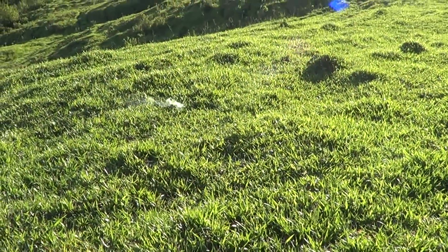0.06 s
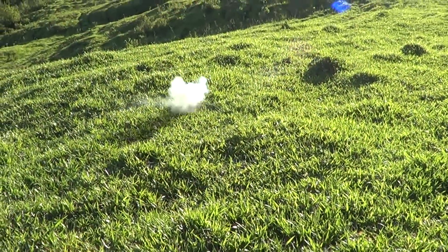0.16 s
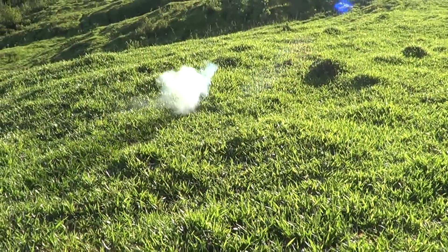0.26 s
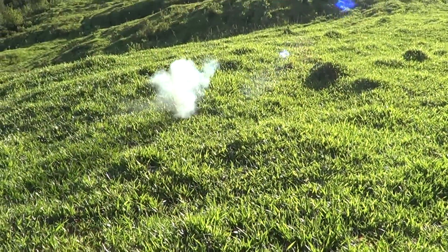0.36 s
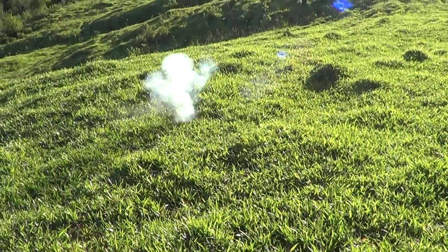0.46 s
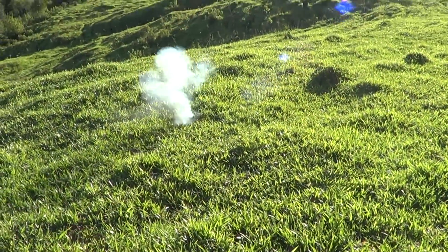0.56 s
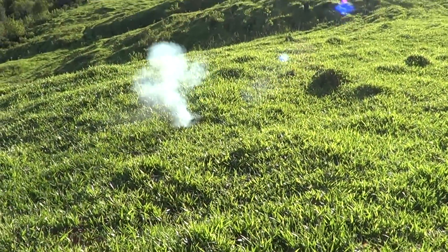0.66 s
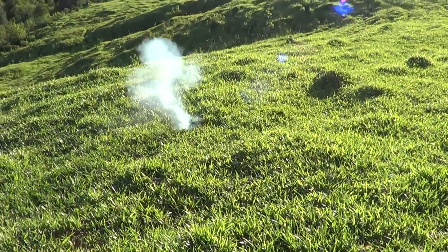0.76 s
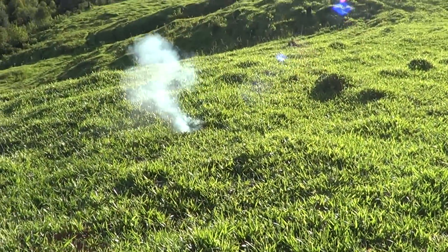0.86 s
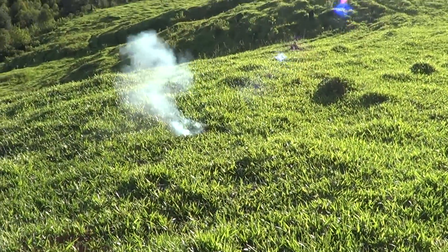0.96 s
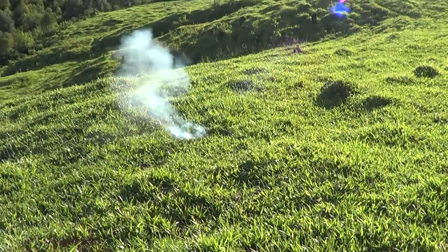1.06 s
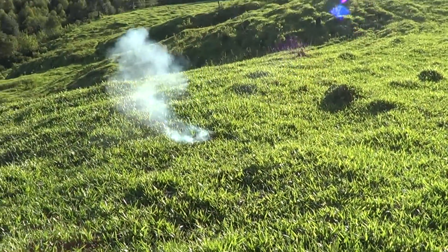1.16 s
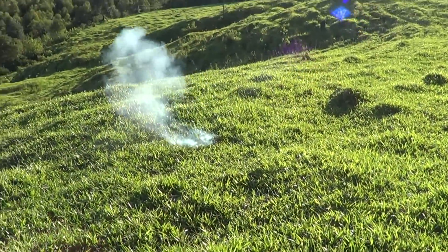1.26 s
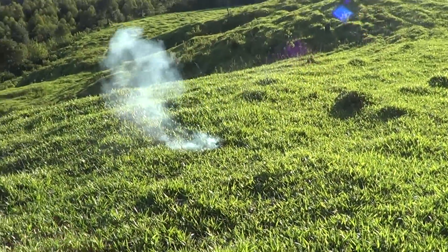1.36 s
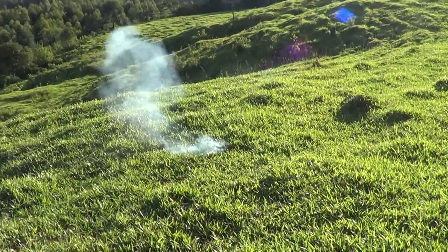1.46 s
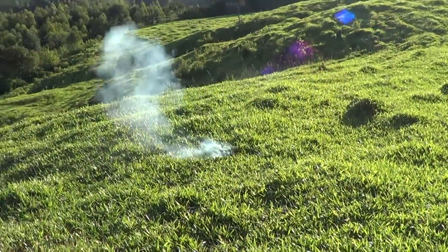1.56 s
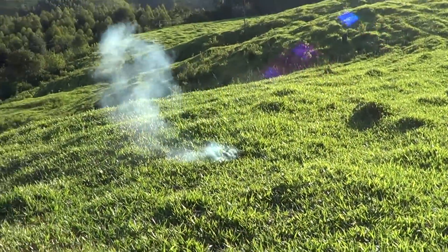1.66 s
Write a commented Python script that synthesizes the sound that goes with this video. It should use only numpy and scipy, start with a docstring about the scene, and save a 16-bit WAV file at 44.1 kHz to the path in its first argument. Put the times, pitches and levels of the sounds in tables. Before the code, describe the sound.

Single sharp firecracker crack outdoors, with a short low boom and scattered echoes fading across a hillside

```python
"""Firecracker on a grassy hillside

Over a faint hiss of air, a low wind and an insect's chirr come a tiny snap and one sharp crack: bursts of noise.
A boom rolls off through the grass: noise in a band that narrows and loses its top.
Slopes mostly on the right return a crackling wash of noise and single echoes made of clicks and short tails.
Far hills on the left add a soft roll of noise. Later, grass ticks and rustles underfoot in short noise flicks.
"""
import sys
import numpy as np
from scipy import signal
from scipy.io import wavfile
from scipy.ndimage import uniform_filter1d

SR = 44100
rng = np.random.default_rng(int(sys.argv[2]) if len(sys.argv) > 2 else 0)


def master_out(mix):
    """Clip the mix to full scale and print it as 16-bit PCM to the path in sys.argv[1]."""
    frames = np.transpose(np.atleast_2d(mix))
    ceiling = np.clip(frames, -1, 1)
    pcm = np.round(ceiling * 32767).astype(np.int16)
    wavfile.write(sys.argv[1], SR, pcm)


N = 74970
T = np.arange(N) / SR   # time [s]
BANG_S = 0.2035


def from_db(db):
    """Turn decibels into a gain."""
    return 10 ** (np.asarray(db) / 20)


def rms_one(x):
    """Scale a sound to an average (rms) level of 1."""
    return x / np.sqrt(np.mean(x ** 2) + 1e-20)


def in_time(rows):
    """Draw straight lines between (time, value) points, one value per sample."""
    return np.interp(T, *np.transpose(rows))


def at_hz(points, hz):
    """Read a (frequency, value) table at hz, with frequency on a log scale."""
    point_hz, value = np.transpose(points)
    return np.interp(np.log(hz), np.log(point_hz), value)


def pan(left_minus_right_db):
    """Give left and right gains that keep the total power equal."""
    gains = from_db(np.array([[.5], [-.5]]) * left_minus_right_db)
    return gains / np.sqrt(np.mean(gains ** 2, axis=0))


def bandpass(x, low_hz, high_hz):
    """Keep mainly the sound between two frequencies."""
    return signal.sosfilt(signal.butter(2, [low_hz, high_hz], "band", fs=SR, output="sos"), x)


def stereo_noise(likeness):
    """Make white noise, from unrelated (0) to nearly the same (1) in the two ears."""
    alike = np.clip(likeness, 0, .999)
    mid, side = rng.standard_normal((2, N))
    return np.sqrt((1 + alike) / 2) * mid + np.sqrt((1 - alike) / 2) * side * [[1], [-1]]


def coloured(gain_db, likeness):
    """Add up quarter-octave noise bands, each with its own gain, which may move in time, and stereo width."""
    edges = np.geomspace(22, 17500, 39)
    white = rng.standard_normal((2, 2, N))
    out = 0
    for k, (low_hz, high_hz) in enumerate(zip(edges, edges[1:])):
        hz = np.sqrt(low_hz * high_hz)
        alike = np.clip(at_hz(likeness, hz), 0, .995)
        # neighbouring bands take turns with two separate noises
        mid, side = bandpass(white[k % 2], low_hz, high_hz)
        stereo = np.sqrt(1 + alike) * mid + np.sqrt(1 - alike) * side * [[1], [-1]]
        out = out + from_db(gain_db(hz)) * stereo
    return out


def shaped(colour, likeness):
    """Make steady noise with a given spectrum and an rms level of 1."""
    return rms_one(coloured(lambda hz: at_hz(colour, hz), likeness))


def smoothed(x, span_s):
    """Take a moving average twice."""
    size = max(int(span_s * SR), 2)
    return uniform_filter1d(uniform_filter1d(x, size), size)


def evened(x, span_s):
    """Hold the short-time level near 1."""
    power = smoothed(np.mean(x ** 2, axis=0), span_s)
    return x / np.sqrt(np.abs(power) + 1e-20)


def flutter(span_s):
    """Make random swings about span_s long, with a spread of 1."""
    return rms_one(smoothed(rng.standard_normal(N), span_s))


def burst(start, hold, decay):
    """Shape a level that starts at once, holds, then dies away exponentially."""
    return (T >= start) * np.exp(-np.clip((T - start - hold) / decay, 0, 50))


def puff(start, db, hz, octaves, decay, likeness, slap=0):
    """Filter a short noise tail, with an optional click at its head, to one band of pitch."""
    half = 2 ** (np.clip(octaves, .03, 4) / 2)
    tail = burst(start, 0, decay) * stereo_noise(likeness)
    click = slap * (np.arange(N) == int(start * SR))
    banded = bandpass(tail + click, hz / half, min(hz * half, .45 * SR))
    # a wider band lets more noise through, so divide by its width
    return from_db(db) * banded / np.sqrt(hz * (half - 1 / half) * 2 / SR)


# spectrum of the air's hiss: (frequency [Hz], relative level [dB per Hz])
HISS_COLOUR = [(30, -1), (70, 16), (150, 7), (1000, -0.5), (2500, -6.5), (4500, -2), (5600, 4.5),
               (6800, 2.5), (8200, 6), (10500, 1), (13000, -0.5), (16000, -32)]
# level of the hiss: (time [s], level [dB])
HISS_LEVEL = [(0, -45), (0.2, -46), (0.3, -35), (0.9, -54.5), (1.7, -49)]
# spectrum of the wind's rumble: (frequency [Hz], relative level [dB per Hz])
WIND_COLOUR = [(25, 0), (65, 8), (120, -9), (300, -25)]
# how alike hiss and wind are in the two ears: (frequency [Hz], likeness [0-1])
AIR_LIKENESS = [(100, 0.97), (500, 0.063), (2400, 0.073), (9000, 1)]
WIND_DB = -59


def air():
    """Hiss that swells just after the bang, sinks and partly returns, over a steady low rumble of wind."""
    hiss = from_db(in_time(HISS_LEVEL)) * shaped(HISS_COLOUR, AIR_LIKENESS)
    wind = from_db(WIND_DB) * shaped(WIND_COLOUR, AIR_LIKENESS)
    return hiss + wind


INSECT_HZ, INSECT_WIDTH_OCT, INSECT_DB = 5910, 0.06, -56.5
INSECT_PULSES_PER_S, INSECT_PULSE_DB = 36, 7   # average rate, swing up and down


def insects():
    """A faint chirr: a narrow band of noise whose level pulses, with slightly uneven timing."""
    edges_hz = INSECT_HZ * 2 ** (INSECT_WIDTH_OCT * np.array([-.5, .5]))
    phase = 2 * np.pi * INSECT_PULSES_PER_S * T + flutter(span_s=0.11)
    pulses = from_db(INSECT_PULSE_DB * np.sin(phase))
    return from_db(INSECT_DB) * rms_one(pulses * bandpass(stereo_noise(likeness=0.34), *edges_hz))


# bursts of the charge: (time [s], level [dB], hold [s], left minus right [dB])
BURSTS = [(0.1422, -23, 0.00085, 1.5), (0.2037, -7, 0.00074, 4)]
# spectrum of snap and crack: (frequency [Hz], relative level [dB per Hz])
CRACK_COLOUR = [(40, 9), (300, 0), (1000, 4.5), (2000, 8), (4000, -4.5), (6000, 6), (9000, 8), (12000, 2.5),
                (16000, -53)]
# spectrum of the spray: (frequency [Hz], relative level [dB per Hz])
SPRAY_COLOUR = [(600, 0), (1200, -3), (2500, -12), (6000, -10), (9000, 0.5), (11000, -4.5), (13000, -10),
                (16000, -13)]
# how alike these are in the two ears: (frequency [Hz], likeness [0-1])
NEAR_LIKENESS = [(60, 0.3), (2000, 0.72), (9000, 1)]
BURST_RELEASE_S = 0.0015
SPRAY_DB, SPRAY_HOLD_S, SPRAY_DECAY_S = -20.5, 0.011, 0.0094
SPRAY_LINGER_DB, SPRAY_LINGER_S = -28.5, 0.04


def crack():
    """The snap and main crack as tiny noise bursts, then bright spray scattered by the grass close by."""
    noise = evened(shaped(CRACK_COLOUR, NEAR_LIKENESS), span_s=0.00074)
    direct = sum(from_db(db) * burst(start, hold, BURST_RELEASE_S) * pan(side)
                 for start, db, hold, side in BURSTS)
    spray = from_db(SPRAY_DB) * burst(BANG_S, SPRAY_HOLD_S, SPRAY_DECAY_S)
    linger = from_db(SPRAY_LINGER_DB) * burst(BANG_S, 0, SPRAY_LINGER_S)
    return direct * noise + (spray + linger) * shaped(SPRAY_COLOUR, NEAR_LIKENESS)


# level of the boom before its surges: (time [s], level [dB])
BOOM_LEVEL = [(0.204, -15.5), (0.26, -12), (0.345, -14.5), (0.415, -16.5), (0.442, -26), (0.456, -19),
              (0.49, -16.5), (0.535, -29), (0.585, -29.5), (0.67, -33.5), (0.85, -46.5), (0.92, -34.5),
              (1.0, -53.5), (1.07, -49), (1.5, -64.5)]
# side of the boom: (time [s], left minus right [dB])
BOOM_PAN = [(0.34, 3), (0.43, 6.5), (0.8, 2)]
# band that survives the grass: (time [s], low edge [Hz], high edge [Hz])
BOOM_BAND = [(0.204, 115, 700), (0.232, 171, 530), (0.269, 226, 398), (0.34, 230, 342), (0.389, 147, 284),
             (0.49, 140, 249), (0.63, 123, 200), (1.0, 106, 154)]
BOOM_EDGE_DB_PER_OCT, BOOM_SKIRT_DB_PER_OCT = 40.5, 26.5   # fall above and below the band
BOOM_SURGE_DB_PER_S, BOOM_SURGE_S = 4.5, 0.024   # surges deepen with age
BOOM_LIKENESS, BOOM_EVEN_S = 0.84, 0.009


def boom():
    """Sound scattered along the ground: longer paths through grass leave a narrower band with less top."""
    time_s, low_hz, high_hz = np.transpose(BOOM_BAND)
    low_oct = np.interp(T, time_s, np.log2(low_hz))
    high_oct = np.interp(T, time_s, np.log2(high_hz))

    def band_gain_db(hz):
        """Quieten pitches the further they lie outside the moving band."""
        above = np.maximum(np.log2(hz) - high_oct, 0)
        below = np.maximum(low_oct - np.log2(hz), 0)
        return -BOOM_EDGE_DB_PER_OCT * above - BOOM_SKIRT_DB_PER_OCT * below

    noise = evened(coloured(band_gain_db, [(200, BOOM_LIKENESS)]), BOOM_EVEN_S)
    surges_db = BOOM_SURGE_DB_PER_S * (T - BANG_S) * flutter(BOOM_SURGE_S)
    level = from_db(in_time(BOOM_LEVEL) + surges_db)
    return (T >= BANG_S) * level * pan(in_time(BOOM_PAN)) * noise


PATCH_DB, PATCH_S = 2, 0.031   # each band swells and fades on its own
GRAIN_S = 0.0053


def scatter(level, colour, peak_s, loss_db, grain_db, likeness):
    """Countless small echoes from a slope: grainy, and duller the later they arrive."""
    late_s = np.clip(T - peak_s, -.15, .6)

    def band_gain_db(hz):
        """Take more treble away with time, and let each band swell at random."""
        return at_hz(colour, hz) - loss_db * late_s * hz / 1000 + PATCH_DB * flutter(PATCH_S)

    grainy = coloured(band_gain_db, likeness) * from_db(grain_db * flutter(GRAIN_S))
    return (T >= BANG_S) * from_db(in_time(level)) * evened(grainy, span_s=0.037)


# level of the wash from the near slopes: (time [s], level [dB])
WASH_LEVEL = [(0.21, -27), (0.28, -36.5), (0.335, -31.5), (0.38, -21), (0.425, -26), (0.46, -25.5),
              (0.51, -27.5), (0.55, -27.5), (0.585, -35), (0.68, -33), (0.76, -38), (0.92, -43.5),
              (0.96, -36), (1.03, -42.5), (1.17, -40.5), (1.7, -75)]
# spectrum of the wash at WASH_PEAK_S: (frequency [Hz], relative level [dB per Hz])
WASH_COLOUR = [(30, -28), (300, -15.5), (700, -1), (1100, -7), (2100, 2), (3000, 0), (5000, 0), (8000, 1.5),
               (11000, -6), (15000, -26)]
# side of the wash: (time [s], left minus right [dB])
WASH_PAN = [(0.21, 0), (0.29, -5.5), (0.55, -5), (1.1, -1)]
# how alike the wash is in the two ears: (frequency [Hz], likeness [0-1])
WASH_LIKENESS = [(300, 0.81), (6000, 0.65)]
WASH_PEAK_S, WASH_LOSS_DB_PER_KHZ_S, WASH_GRAIN_DB = 0.37, 10, 2


def near_wash():
    """A crackling wash: scattered noise from the near slopes, leaning right."""
    wash = scatter(WASH_LEVEL, WASH_COLOUR, WASH_PEAK_S, WASH_LOSS_DB_PER_KHZ_S, WASH_GRAIN_DB, WASH_LIKENESS)
    return wash * pan(in_time(WASH_PAN))


# single echoes off the slopes:
# (time [s], strength [dB], centre [Hz], width [octaves], decay [s], left minus right [dB])
ECHOES = [(0.297, -26, 3400, 0.55, 0.0016, -12), (0.34, -24.5, 1740, 1, 0.0016, -2),
          (0.388, -20.5, 1830, 3, 0.012, -27), (0.4493, -14.5, 970, 1.84, 0.0024, -11),
          (0.4675, -21, 1160, 2.6, 0.0037, -5.5), (0.481, -24, 2020, 0.6, 0.0042, -7),
          (0.491, -20, 2180, 0.33, 0.0035, -3), (0.506, -24.5, 2100, 0.17, 0.0013, 3),
          (0.534, -23, 1460, 2.2, 0.0049, -5), (0.546, -25, 2130, 0.15, 0.0075, -5),
          (0.685, -29.5, 1720, 0.63, 0.0045, -6), (0.7602, -18.5, 578, 0.81, 0.0015, -6),
          (0.787, -32.5, 750, 1, 0.0063, -6), (0.898, -34, 660, 0.74, 0.0042, -6.5),
          (0.971, -33.5, 646, 1.1, 0.0059, -2), (1.504, -34, 630, 0.79, 0.0049, 4)]
ECHO_SLAP = 6.8   # clean click at the head of each echo, against its rough tail


def single_echoes():
    """Separate returns of the bang: each a band-limited click with a short noise tail."""
    return sum(puff(start, db, hz, octaves, decay, likeness=1.0, slap=ECHO_SLAP) * pan(side)
               for start, db, hz, octaves, decay, side in ECHOES)


# level of the roll from the far hills: (time [s], level [dB])
ROLL_LEVEL = [(0.21, -94), (0.75, -54), (1.0, -45), (1.17, -40), (1.32, -39), (1.52, -37), (1.63, -42),
              (1.7, -41.5)]
# spectrum of the roll at ROLL_PEAK_S: (frequency [Hz], relative level [dB per Hz])
ROLL_COLOUR = [(50, -30), (150, 1), (620, 3.5), (1600, -2), (2800, -6.5), (5000, -6.5), (8000, -25.5),
               (15000, -74)]
# how alike the roll is in the two ears: (frequency [Hz], likeness [0-1])
ROLL_LIKENESS = [(1000, 0.96), (4500, 0.63)]
ROLL_PEAK_S, ROLL_LOSS_DB_PER_KHZ_S, ROLL_GRAIN_DB = 1.335, 6.5, 1.5
ROLL_PAN_DB = 2.5   # left minus right


def far_roll():
    """A soft roll: scattered noise from the far hills, arriving slowly from the left."""
    roll = scatter(ROLL_LEVEL, ROLL_COLOUR, ROLL_PEAK_S, ROLL_LOSS_DB_PER_KHZ_S, ROLL_GRAIN_DB, ROLL_LIKENESS)
    return roll * pan(ROLL_PAN_DB)


# grass blades ticking and brushing underfoot: (time [s], level [dB], centre [Hz], decay [s])
TICKS = [(0.835, -39.5, 4340, 0.042), (1.167, -39.5, 8000, 0.0029), (1.443, -31, 3600, 0.0018),
         (1.503, -32.5, 7000, 0.0014), (1.557, -39, 8700, 0.0017), (1.694, -32.5, 6600, 0.0013)]
TICK_WIDTH_OCT = 1.37


def grass_ticks():
    """Blades tick and brush underfoot: short fading puffs of noise in one band each."""
    return sum(puff(start, db, hz, TICK_WIDTH_OCT, decay, likeness=0.88) for start, db, hz, decay in TICKS)


RUSTLE_FROM_S, RUSTLE_PER_S = 0.96, 90   # flicks per second, on average
RUSTLE_DB, RUSTLE_SPREAD_DB = -61.5, 6.5
RUSTLE_LOW_HZ, RUSTLE_HIGH_HZ = 7000, 12400


def rustle():
    """Blades of grass flick at random, each a burst of bright noise fading over about a millisecond."""
    sizes = from_db(RUSTLE_SPREAD_DB * np.minimum(rng.exponential(1, N), 3))
    flicks = sizes * (rng.random(N) < RUSTLE_PER_S / SR) * (T > RUSTLE_FROM_S)
    fading = signal.lfilter([1], [1, -np.exp(-1000 / SR)], flicks + 1e-18)
    grains = fading * stereo_noise(likeness=.9)
    return from_db(RUSTLE_DB) * rms_one(bandpass(grains, RUSTLE_LOW_HZ, RUSTLE_HIGH_HZ))


def scene():
    """Add together everything on the hillside."""
    background = air() + insects()
    bang = crack() + boom()
    hills = near_wash() + single_echoes() + far_roll()
    grass = grass_ticks() + rustle()
    return background + bang + hills + grass


CUTOFF_HZ = 15300


def record(dry):
    """Round off the peaks smoothly below 0.85, then cut the highest treble."""
    rounded = dry / (1 + (dry / .85) ** 6) ** (1 / 6)
    return signal.sosfilt(signal.ellip(10, .1, 80, CUTOFF_HZ, fs=SR, output="sos"), rounded)


dry = scene()
out = record(dry)
master_out(out)
```